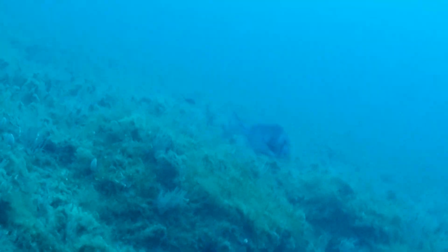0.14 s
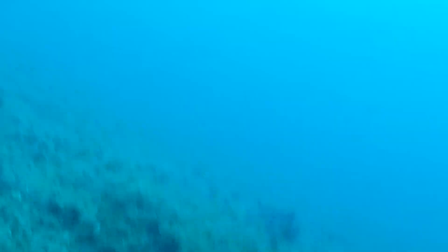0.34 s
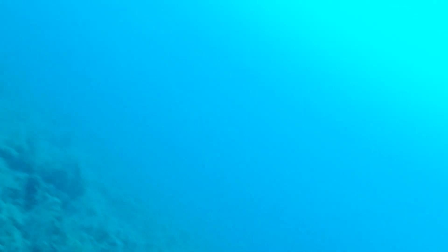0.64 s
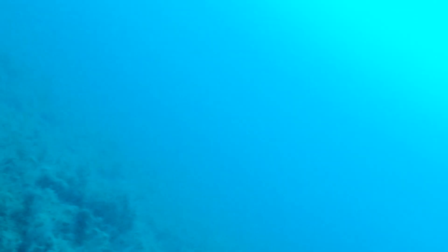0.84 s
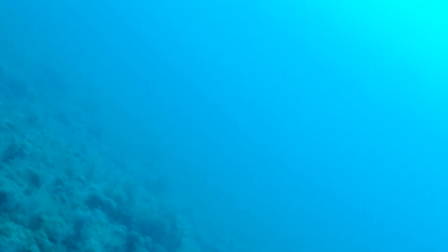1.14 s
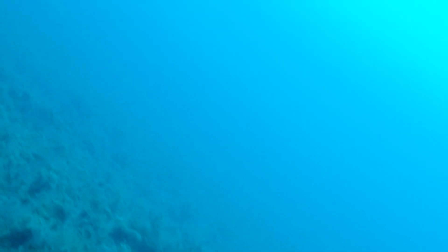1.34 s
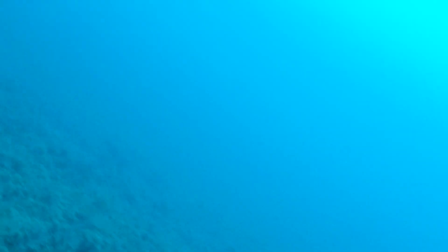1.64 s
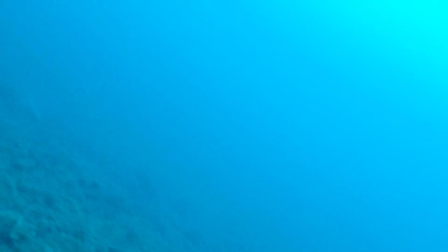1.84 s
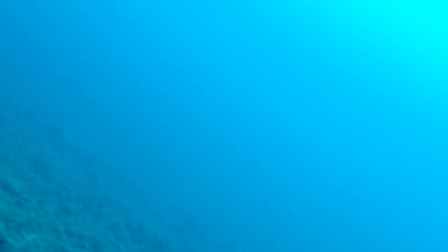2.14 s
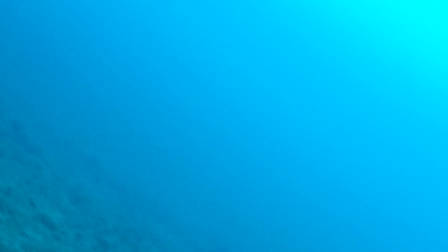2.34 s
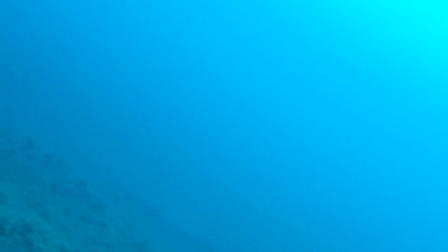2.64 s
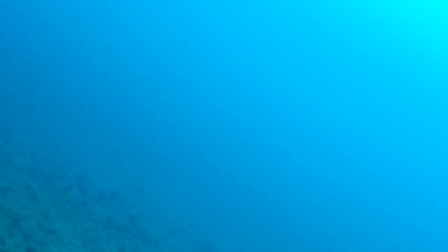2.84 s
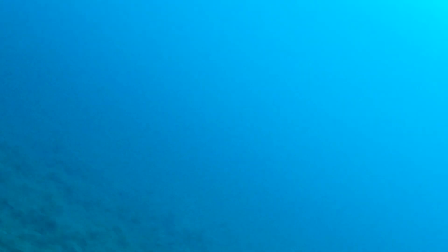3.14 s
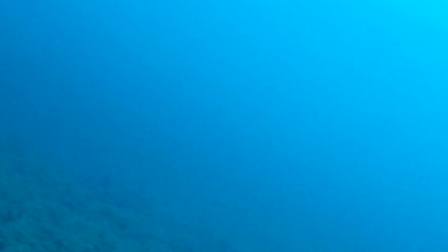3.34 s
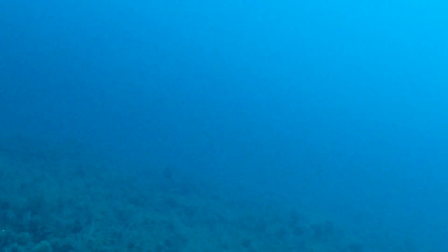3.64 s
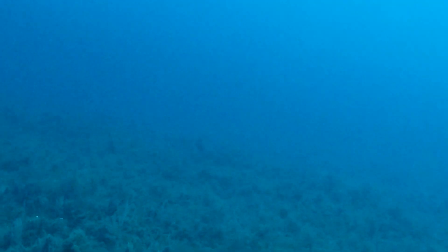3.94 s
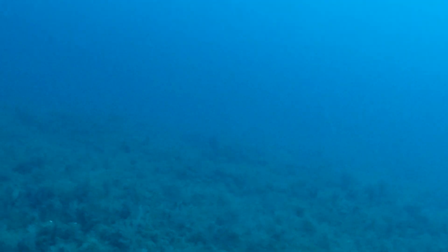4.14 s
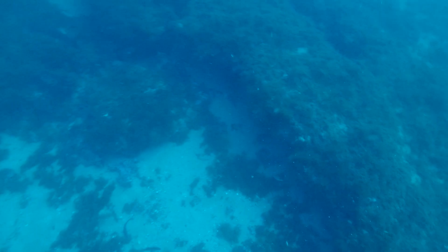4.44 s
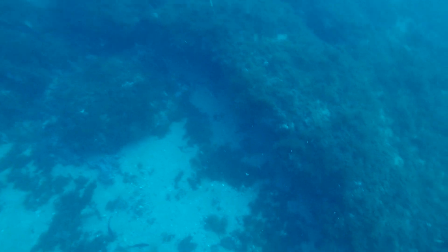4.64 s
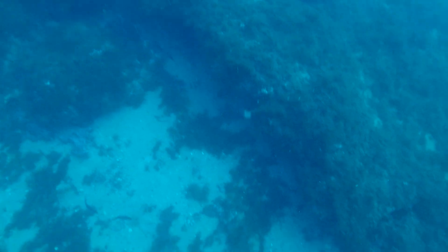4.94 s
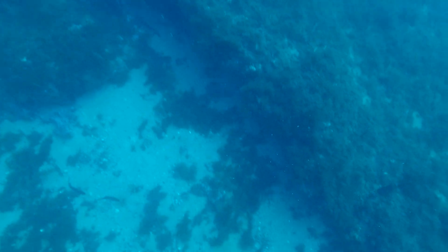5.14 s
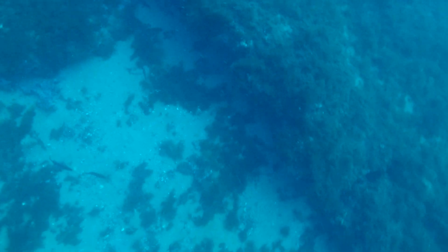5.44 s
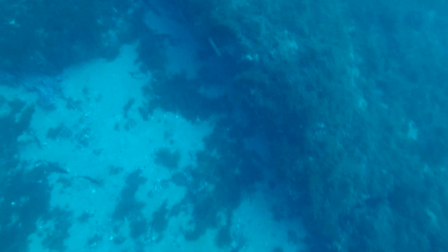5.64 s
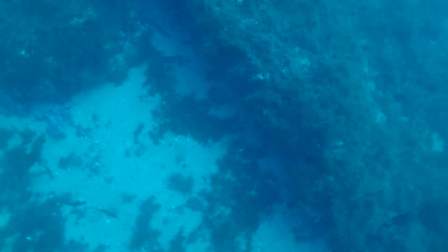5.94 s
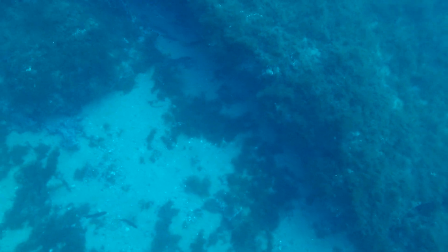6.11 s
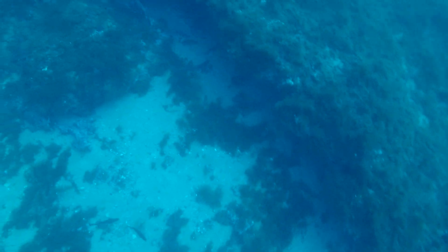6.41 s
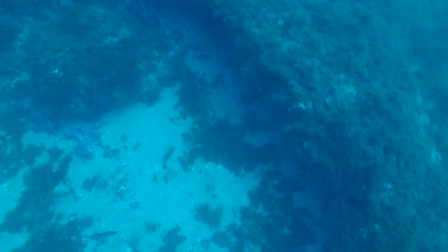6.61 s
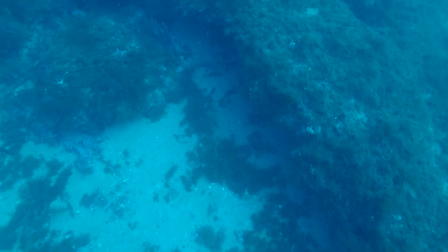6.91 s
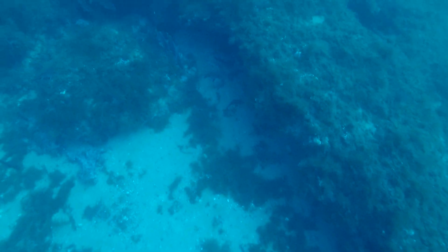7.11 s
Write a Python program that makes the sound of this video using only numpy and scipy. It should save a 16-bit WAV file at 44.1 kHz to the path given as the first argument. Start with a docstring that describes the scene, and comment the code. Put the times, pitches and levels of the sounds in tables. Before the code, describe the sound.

Muffled boat engine clatter rings beneath the sea amid fine shrimp crackle and booming bubbles, then a cut brings rumble, taps and sharp snaps.

```python
"""Under water over a reef, from a camera drifting in a dive housing with two microphones on its plates.
From the start a far boat diesel knocks and rings the case near 1.4 kHz, over shrimp crackle and slow flow;
bubbles gurgle and boom in a low air pocket, mostly on the right, and a dull bump shakes the case at 2.2 s.
At 4.4 s a cut leads to a second place: a surge rumbles and dies away, gear taps the case, the diesel is weaker.
A small bright tick follows at 5.4 s, and the hardest near snap at 6.6 s; diesel and water go on to the end."""
import sys
import numpy as np
from scipy import signal
from scipy.io import wavfile
from scipy.ndimage import uniform_filter1d

SR = 44100
rng = np.random.default_rng(int(sys.argv[2]) if len(sys.argv) > 2 else 0)


def digitize_waveform(pressure):
    """Quantize a signal to 16-bit integers and store it at the path in sys.argv[1].

    Rows of a 2-D input are taken as channels; values are limited to [-1, 1].
    """
    field = np.atleast_2d(pressure).T
    bounded = np.clip(field, -1, 1)
    quanta = np.round(bounded * 32767).astype(np.int16)
    wavfile.write(sys.argv[1], SR, quanta)


N = 320607
T = np.arange(N) / SR  # seconds
CUT_S = 4.435
AFTER = T >= CUT_S

# Slow flow, and a surge at the cut that dies away
FLOW_DB, SURGE_DB, SURGE_FADE_DB_S = -81, -55.5, 10.5
# Broad wash under the modes. Each row: centre in Hz, relative density in dB per Hz, likeness left to right (-1 to 1)
WASH_BANDS = [(121, -26, -0.49), (181, 1.5, 0.62), (240, -3, -0.024), (410, -6.5, -0.46),
              (642, -11.5, -0.83), (1090, -3, -0.99), (1710, -8.5, -0.4), (2870, -27, 0.74),
              (4920, -28.5, 0.0022), (9100, -26, 0.82), (11400, -36, -0.67), (14900, -26.5, 0.59)]
WASH_DB = -49.5
# Moving water, one list per place. Each row: time in seconds, pocket murmur in dB,
# wash swell in dB (heard about its mean)
WATER_LEVELS = [
    [(0.0, -49.5, -65.5), (0.42, -53, -58), (0.7, -58, -61), (1.0, -58.5, -64), (2.0, -59, -63.5),
     (2.45, -58.5, -59.5), (3.05, -54.5, -63), (3.6, -54.5, -59.5), (3.95, -52, -63.5), (4.43, -56.5, -65)],
    [(4.44, -51, -65), (5.0, -55.5, -67.5), (5.35, -63, -66), (5.8, -56, -64), (6.3, -58, -66.5),
     (6.6, -62, -69.5), (7.27, -60, -66.5)],
]
# Booms in the air pocket. Each row: time in seconds, level in dB, pitch in Hz, left minus right in dB
BOOMS = [(0.134, -27, 154, -7), (0.199, -31, 157, -1), (0.359, -31, 159.4, -14), (0.404, -32, 160, -11),
         (0.565, -31.5, 164, -7.5), (0.69, -40, 160, -11), (0.738, -40, 160, -16.5), (0.965, -41, 160, -9),
         (1.098, -39.5, 148, -13), (1.42, -43.5, 158, -11), (1.84, -43.5, 158, -11),
         (2.014, -40.5, 269, -6), (2.629, -41, 188, -9), (3.509, -45, 275, -4), (4.621, -37.5, 209, 0),
         (4.897, -37.5, 187, -7), (0.915, -36, 211, 0), (2.081, -39.5, 154, -8), (2.239, -33.5, 179, -7.5),
         (2.32, -38, 181, 3), (2.518, -40, 163, -7.5), (3.117, -37, 157, -5), (3.184, -36.5, 156, -7),
         (3.264, -29.5, 161, -13), (3.378, -30, 150, -6), (3.46, -22.5, 157, -8.5), (3.712, -27, 159.7, -5),
         (3.902, -31, 157.4, -11.5), (4.014, -37, 155, -6), (4.314, -38, 160, -15), (4.41, -39.5, 170, -7),
         (4.795, -39.5, 181, -14), (5.29, -34.5, 157, -4), (5.752, -30, 205, -2), (5.771, -30, 230, -0.5),
         (5.804, -33, 164, -7), (5.889, -41.5, 184, -9), (5.934, -35, 173, -7), (6.068, -35.5, 172, -7.5)]
BOOM_RISE_MS, BOOM_HOLD_MS, BOOM_RING_MS = 3.9, 9.9, 150  # at the pocket's pitch; the ring falls 60 dB
POCKET_HZ, QUICKER = 160, 0.71  # a boom above the pocket's pitch runs quicker by this power of the ratio
# Bursts of small bubbles. Each row: start in seconds, time to the fade in seconds, level in dB,
# largest bubbles in dB relative to that level
GURGLES = [(0.115, 0.021, -41, -10.5), (0.277, 0.21, -42, -12.5), (0.532, 0.058, -50, -16),
           (3.095, 0.031, -48, -0.5), (3.227, 0.03, -52, -1.5), (3.437, 0.028, -43, -1),
           (3.72, 0.21, -49, -7.5), (4.781, 0.019, -53, 0), (5.738, 0.038, -54, 11.5)]
GURGLE_RISE_S, GURGLE_FADE_DB_S = 0.0041, 244
# Treble modes rung by snaps. Each row: pitch in Hz, nominal width in Hz, relative level in dB before the cut,
# the same after it, left minus right in dB, lead of the right in radians
TREBLE_MODES = [(2900, 950, -1, -6, 2, 0.9), (3880, 5100, -37, -16.5, -26.5, 3),
                (5770, 550, 0.5, 3, 5.5, 3.5), (7320, 1860, -7, 2.5, -10, 3.5),
                (7560, 1450, 2.5, -3.5, -10, 3.5), (9490, 1040, -4, -1.5, -10, 5),
                (13400, 940, -19, -12, -3, -5)]
# Near snaps. Each row: start in seconds, peak of the bright part in dB, dull part in dB relative to the bright
NEAR_SNAPS = [(0.0247, -37, -30), (0.073, -32.5, -27), (0.4754, -38, -30), (0.912, -35.5, -23),
              (1.0894, -40, -30), (1.554, -36, -32), (1.846, -39, -30), (5.049, -37, -30),
              (5.2041, -36, -30), (6.0107, -36, -28), (6.379, -37, -30), (6.768, -38.5, -26),
              (7.191, -38, -30), (0.443, -34.5, -13), (0.584, -35.5, -5), (0.709, -33, -22),
              (0.987, -34, -28), (1.028, -31, -11), (1.252, -35, -32), (1.4787, -31.5, -17),
              (1.7468, -35, -10), (1.901, -32.5, -29), (1.9387, -31, -32), (2.529, -36, -26),
              (2.504, -43, -30), (2.596, -42, -30), (2.671, -35, -40), (2.6815, -37, -30),
              (2.6865, -40, -30), (2.6935, -39, -30), (2.7015, -40, -30), (2.713, -26, -35),
              (2.746, -33, -29), (3.176, -38, -22), (3.48, -35, -20), (3.4845, -33, -25),
              (3.5683, -37, -30), (3.587, -34.5, -12), (3.955, -33, -31), (4.084, -33.5, -10),
              (4.1125, -35, -12), (4.475, -35, -32), (4.552, -35.5, -30), (4.605, -38, -30),
              (5.432, -39, -30), (4.9771, -26.5, -6), (5.015, -29, -8), (5.226, -31, -38),
              (5.5876, -35, -38), (5.6206, -33, -34), (6.072, -34, -31), (6.161, -23.5, -10),
              (6.252, -31.5, -31), (6.463, -33.5, -11), (6.498, -28.5, -37), (6.601, -19, -8),
              (6.6155, -35, -30), (6.859, -30.5, -29), (6.9586, -34, -16)]
CRACKLE_PER_S, CRACKLE_DB = 900.0, -60
CRACK_DB, CRACK_MS = -0.5, 0.03  # wide crack in the dull part of a near snap
# Dull bumps on the case. Each row: start in seconds, relative size in dB, time scale of the left swing in ms,
# of the right swing in ms, left minus right in dB
BUMPS = [(0.054, -34, 1.15, 1.55, -4), (.127, -26, 1.35, 1.6, -2), (2.2061, -12.5, 0.96, 1.44, -7.5),
         (3.458, -30, 1.3, 1.8, 10), (3.713, -27.5, 2.1, 2.8, 5.5), (4.440, -31, 1.8, 1.8, -8.5),
         (4.5719, -25, 2.1, 1.6, 2)]
CLICK_MS = 0.036  # thin click inside a tap and inside a bump
# Gear taps on the case. Each row: start in seconds, level in dB, contact in ms (never under 0.1)
TAPS = [(4.5604, -18.5, 0.51), (4.5854, -14, 0.54), (4.684, -35, 0.17), (4.785, -31, 0.71),
        (4.803, -28, 0.65), (4.977, -30.5, 0.089), (5.0144, -25, 0.36)]
# Small bright tick. Each row: start in seconds, relative level in dB, pitch in Hz
TICKS = [(5.4147, -26, 2960)]
# Modes of the housing. Each row: pitch in Hz, nominal width in Hz, engine share in dB before the cut,
# engine share in dB after it, tap share in dB, left minus right in dB, lead of the right in radians
HOUSING_MODES = [(560, 92, -8.5, -5.5, -19, -0.5, -3.0), (813, 65, -4.5, -0.5, -8.5, 0.5, -3.0),
                 (1083, 64, -8.5, -4.5, 3.5, -0.5, -2.5), (1242, 89, 6, 9, -27, 3.5, -2.5),
                 (1340, 99.3, 7.5, 7.5, -19, 1, -1.5), (1485.5, 142, -3.5, -2, -17, -6.5, -1.15),
                 (1938, 91, -15.5, -1.5, 0.5, -0.5, 4), (2136, 120, -15, -24, -30, 10, 2.5),
                 (2656, 100, -19, -29, -22, -8, 0.5), (3037, 76, -20, -19, -39, -4, -0.4),
                 (3640, 260, -29.5, -22.5, -13.5, 5.5, 0.7)]
MAIN = 4  # row of the main mode
LOW_CUT_HZ = 137.8  # the camera's steep low cut
# The diesel as heard, one list per place. Each row: time in seconds, level in dB, change of the mode near 1 kHz in dB
ENGINE_LEVELS = [
    [(0.0, -42, 0), (0.3, -41, 3), (0.6, -43, -2), (1.2, -43.5, 3), (2.05, -39.5, -1), (2.4, -46, 8),
     (3.03, -44.5, 14), (3.85, -46, 6.5), (4.43, -42.5, 6)],
    [(4.44, -54.5, -6), (5.09, -51, 8), (5.59, -54.5, -22), (6.1, -47, 1), (7.27, -47, 10)],
]
# The case turns, one list per place. Each row: time in seconds, main mode in Hz, then changes in dB of
# its lower neighbour, its upper neighbour and the mode near 2 kHz
CASE_TURN = [
    [(0, 1350, -2, 3.5, -2), (0.5, 1407, -6.5, 2, 5), (1.0, 1400, -3.5, 1.5, 0), (1.5, 1383, -10.5, 0, -1),
     (2.1, 1360, -4, -6.5, 9), (2.6, 1324, 2.5, -0.5, 8), (3.0, 1315, 3, 1, -15), (3.4, 1363, -1, 0, 5),
     (4.0, 1372, -6, -1.5, 0), (4.43, 1360, -3.5, 1, -3)],
    [(4.44, 1327, 0, 1, -5), (5.2, 1340, -14, 3, 2.5), (5.7, 1370, 0, 1, 4), (6.0, 1278, -14, 0, 6),
     (6.5, 1294, -1, 1.5, -6), (7.27, 1348, -9, -5, 0)],
]
# Knock of the four cylinders in relative dB: one row before the cut, one after
CYLINDERS_DB = [(0, -14.5, -3.5, -5), (2, -12.5, -3, -37)]
# The engine speed wavers, so firings come early or late. Each row: time in seconds, lag in ms
FIRING_LAG = [(0, 10.8), (4.43, 6.9), (4.44, 0.79), (5.9, 12), (7.27, 6.3)]
# Loudest firings. Each row: time in seconds, level in dB (the peak stands 3 dB above it), main mode in Hz
LOUD_KNOCKS = [(0.0278, -39, 1462), (0.1146, -41, 1330), (0.2593, -41, 1340), (0.2967, -40, 1425),
               (0.3745, -39.5, 1405), (0.6469, -36.5, 1354), (0.7317, -40, 1356), (0.8086, -39, 1436),
               (1.0425, -40.5, 1280), (1.2077, -37.5, 1360), (1.2979, -38.5, 1444), (1.3628, -40.5, 1340),
               (1.4082, -44, 1340), (1.5259, -38.5, 1340), (1.5658, -35.5, 1385), (1.6846, -39.5, 1294),
               (1.7644, -36.5, 1370), (1.8437, -41, 1380), (1.9245, -45.5, 1375), (2.0023, -40, 1340),
               (2.0877, -35, 1366), (2.1655, -39, 1355), (2.2438, -38.5, 1313), (2.3196, -39, 1340),
               (2.4813, -39, 1340), (2.9612, -42, 1400), (3.2031, -40.5, 1516), (3.2809, -39.5, 1340),
               (3.3603, -41.5, 1374), (3.4401, -43.5, 1365), (3.5234, -40.5, 1390), (3.7938, -39.5, 1400),
               (3.9544, -40.5, 1350), (4.0716, -42, 1340), (4.1395, -42.5, 1390), (4.9383, -42, 1320),
               (5.4257, -41.5, 1346), (5.5893, -44.5, 1380), (5.9884, -45, 1280), (6.0672, -41, 1304),
               (6.2249, -38, 1320), (6.382, -41.5, 1290), (6.4224, -42, 1360), (6.5411, -38.5, 1330),
               (6.6973, -43, 1357), (6.8574, -41.5, 1363), (7.1009, -43.5, 1350), (7.1702, -44.5, 1367)]
FIRING_HZ = 25.12
SAME_AGAIN, HALF_CYCLE_DB = 0.8, -4.5  # likeness of successive cycles; share that returns every half cycle
CLACK_EARLY_MS, CLACK_MS = 4.2, 4.4  # bright clack ahead of each firing
ECHO_MS, ECHO_DB = 6.5, -6  # a loud blow comes again off the bottom
TOP_HZ = 15700


def undb(db):
    """Gain from decibels."""
    return 10 ** (np.asarray(db) / 20)


def unit(x):
    """Scale to an rms of 1."""
    return x / np.sqrt(np.mean(np.abs(x) ** 2))


def curves(tables):
    """Straight lines through the rows of both places, one curve per column."""
    times, *columns = np.transpose(np.vstack(tables))
    return [np.interp(T, times, column) for column in columns]


def either(before_db, after_db):
    """Gain that steps at the cut."""
    return np.where(AFTER, undb(after_db), undb(before_db))


def walk(rate):
    """Random levels held 1 / rate seconds and slewed twice; spread near 1."""
    hold = int(SR / rate)
    steps = np.repeat(rng.standard_normal(N // hold + 1), hold)
    return 1.85 * uniform_filter1d(uniform_filter1d(steps, hold), hold)[:N]


def add(out, start_s, sound):
    """Lay a sound into the mix at its start."""
    i = int(start_s * SR)
    out[..., i:i + sound.shape[-1]] += sound[..., :N - i]


def filtered(design, x):
    """Run second-order sections over a sound."""
    return signal.sosfilt(design, x)


def click(t, db, late_ms, ms):
    """One very short swing."""
    u = (t * 1000 - late_ms) / ms
    return -undb(db) * u * np.exp(0.5 - u ** 2 / 2)


def ring(x, hz, width_hz):
    """Complex mode: a damped resonance with gain 1 at its centre."""
    r = np.exp(-np.pi * width_hz / SR)
    return signal.lfilter([1 - r], [1, -r * np.exp(2j * np.pi * hz / SR)], x)


def plates(z, pan_db, lead):
    """Each microphone hears one mode at its own level and phase; z may differ from side to side."""
    z = np.atleast_2d(z)
    left = undb(pan_db / 2) * z[0].imag
    right = undb(-pan_db / 2) * (z[-1] * np.exp(1j * lead)).imag
    return np.array([left, right])


def housing(push, gains, spread, sharp, main_hz=HOUSING_MODES[MAIN][0]):
    """One push rings all case modes; neighbours swing in opposite sense, which fills the gaps between them."""
    modes = [ring(ring(push, f, spread * w), f, sharp * w) for f, w, *_ in HOUSING_MODES]
    # the main mode may drift: turn the push down to 0 Hz, ring it there and turn it back
    turn = np.exp(2j * np.pi * np.cumsum(main_hz * np.ones(len(push))) / SR)
    main_width = HOUSING_MODES[MAIN][1]
    modes[MAIN] = turn * ring(ring(push / turn, 0, spread * main_width), 0, sharp * main_width)
    return sum((-1) ** k * gain * plates(z, pan, lead)
               for k, (gain, z, (*_, pan, lead)) in enumerate(zip(gains, modes, HOUSING_MODES)))


def rumble():
    """Slow flow presses on both microphones nearly alike: low noise with a large common part."""
    band = signal.butter(1, [7.0, 40.0], "band", fs=SR, output="sos")
    flow = filtered(band, rng.standard_normal((3, N)))
    size = undb(FLOW_DB) + AFTER * undb(SURGE_DB - SURGE_FADE_DB_S * (T - CUT_S))
    sway_db = 1.5 * walk(7.6) + np.array([[-1.0], [1.0]])
    return size * undb(sway_db) * unit(flow[0] + 0.5 * flow[1:])


def wash():
    """Third-octave bands of noise flicker alone; moving water swells the low ones most."""
    hz, db, alike = np.transpose(WASH_BANDS)
    swell_db = curves(WATER_LEVELS)[1]
    swell_db = swell_db - swell_db.mean()
    out = 0
    for f in 125 * 2 ** np.arange(0, 7, 1 / 3):
        likeness = np.interp(np.log(f), np.log(hz), alike)
        band = signal.butter(2, [f / 1.144, f * 1.143], "band", fs=SR, output="sos")
        mid, side = filtered(band, rng.standard_normal((2, N)))
        flicker_db = min(2.4, 12000.0 / f) * walk(12)
        gain = undb(np.interp(np.log(f), np.log(hz), db) + min(370.0 / f, 1) * swell_db + flicker_db)
        opposed = np.sqrt(1 - likeness) * side * np.array([[1], [-1]])
        out = out + gain * (np.sqrt(1 + likeness) * mid + opposed)
    return unit(out) * undb(WASH_DB)


def air_pocket():
    """The pocket murmurs and booms as resonances; a boom swells, holds a few swings and dies."""
    murmur = np.array([undb(db) * unit(ring(ring(rng.standard_normal(N), hz, 27.5), hz, 26.0).imag)
                       for hz, db in [(144, -3.0), (162, 5.5)]])  # left, right
    out = murmur * undb(curves(WATER_LEVELS)[0] + 2.77 * walk(14))
    t = T[:8192]
    leads = 2.07 + 0.45 * rng.standard_normal(len(BOOMS))
    for (s, db, hz, pan), lead in zip(BOOMS, leads):
        ms = t * 1000 * (hz / POCKET_HZ) ** QUICKER
        swell = (1 - np.exp(-ms / BOOM_RISE_MS)) ** 2
        decay = undb(-60 * np.clip(ms - BOOM_HOLD_MS, 0, None) / BOOM_RING_MS)
        boom = plates(swell * decay * np.exp(2j * np.pi * hz * t), pan, lead)
        add(out, s - 1.76 / hz, undb(db) * boom)  # the swell starts ahead of the listed time
    return out


def gurgle():
    """Random pops ring three bubble sizes; each burst rises fast, holds and fades."""
    pops = (rng.random(N) < 300.0 / SR) * rng.standard_normal(N)
    # pitch Hz, width Hz, level dB, left minus right dB, lead of the right rad
    bubbles = [(354.0, 115.0, -1.0, -1.3, -2.0), (561.0, 35.0, 0.0, 1.0, -3.0), (873.0, 80.0, -10.0, 0.0, -2.0)]
    large, *small = [undb(db) * plates(unit(ring(ring(pops, hz, 170.0), hz, width)), pan, lead)
                     for hz, width, db, pan, lead in bubbles]
    sizes, t = np.zeros((2, N)), T[:SR // 2]
    for s, length, db, large_db in GURGLES:
        fade_db = GURGLE_FADE_DB_S * np.clip(t - length, 0, None)
        swell = np.clip(t / GURGLE_RISE_S, 0, 1) * undb(db - fade_db)
        add(sizes, s, swell * undb([[0], [large_db]]))
    return sizes[0] * sum(small) + sizes[1] * large


def far_shrimp(spread_db=6.0, hiss_db=-0.5):
    """Countless far snaps of very uneven size ring the treble modes and merge to a crackle."""
    snaps = rng.random(N) < CRACKLE_PER_S / SR
    size = undb(spread_db * rng.exponential(size=N).clip(0, 3.2))
    swing = rng.standard_normal(N) + 0.79 * rng.standard_normal((2, N))
    far = unit(snaps * size * swing) * undb(1.6 * walk(7.9))
    push = far + undb(hiss_db) * rng.standard_normal((2, N))
    crackle = sum((-1) ** k * either(a, b) * plates(ring(ring(push, f, 1.38 * w), f, w), pan, lead)
                  for k, (f, w, a, b, pan, lead) in enumerate(TREBLE_MODES))
    return unit(crackle) * undb(CRACKLE_DB)


def near_shrimp():
    """Near snaps stand out: short noise bursts ring the treble modes, each with its own colour."""
    out, t = np.zeros((2, N)), T[:512]
    colours_db = 2.5 * rng.standard_normal((len(NEAR_SNAPS), len(TREBLE_MODES)))
    bursts = rng.standard_normal((len(NEAR_SNAPS), len(t))) * np.exp(-t / 0.0009)
    bursts[:, 0] = 4.4  # every snap starts with a hard blow
    crack = undb(CRACK_DB) * click(t, 0, 2 * CRACK_MS, CRACK_MS)
    for (s, db, dull_db), colour_db, burst in zip(NEAR_SNAPS, colours_db, bursts):
        parts = [undb((b if s > CUT_S else a) + g) * plates(ring(ring(burst, f, 2.2 * w), f, w), pan, lead)
                 for (f, w, a, b, pan, lead), g in zip(TREBLE_MODES, colour_db)]
        bright = sum(parts[1:])
        dull = parts[0] + crack * np.abs(parts[0]).max()
        snap = bright / np.abs(bright).max() + undb(dull_db) * dull / np.abs(dull).max()
        add(out, s, undb(db) * snap)
    return out


def bumps():
    """Each plate snaps over and settles; every half swing is longer and weaker than the one before."""
    out, t = np.zeros((2, N)), T[:2048]
    for s, db, *ms, pan_db in BUMPS:
        swing = t * 1000 / np.array(ms)[:, None]
        slowing = np.sin(6.1 * np.log(1 + swing) + np.array([[0], [-1.85]]))
        onset = (1 - np.exp(-9.0 * swing)) ** 2
        flex = slowing * np.exp(-0.25 * swing) / (1 + swing) ** 0.83 * onset
        sides = undb(db + np.array([[pan_db], [-pan_db]]) / 2)
        add(out, s, sides * (flex + click(t, db=-27.5, late_ms=0.13, ms=CLICK_MS)))
    return filtered(signal.butter(4, 110.0, "high", fs=SR, output="sos"), out)


def taps():
    """Gear gives a short push into every housing mode; a longer, softer contact is duller."""
    out, t = np.zeros((2, N)), T[:2048]
    for s, db, ms in TAPS:
        push = np.sin(np.pi * np.clip(t * 1000 / max(ms, 0.1), 0, 1))
        hit = housing(push, [undb(mode[4]) for mode in HOUSING_MODES], 19.0, 2.4)
        thin = click(t, db=-24, late_ms=0.9, ms=CLICK_MS)
        add(out, s, undb(db) * (hit / np.abs(hit).max() + thin))
    for s, db, hz in TICKS:
        tick = t / 0.0023 * np.exp(-t / 0.0022 + 2j * np.pi * hz * t)
        add(out, s, undb(db) * plates(tick, 0.0, -1.55))
    return out


def cyclic(count):
    """Noise returns every `count` firings and renews itself slowly: the same parts strike over the same paths."""
    period = int(round(count * SR / FIRING_HZ))
    fresh = rng.standard_normal((N // period + 1, period))
    fresh[1:] *= np.sqrt(1 - SAME_AGAIN ** 2)
    return signal.lfilter([1], [1, -SAME_AGAIN], fresh, axis=0).ravel()[:N]


def clacks(times, size):
    """A short bright rattle just ahead of each firing rings the modes near 3 kHz."""
    early = (times - CLACK_EARLY_MS / 1000).clip(0)
    starts = np.bincount((early * SR).astype(int), np.sqrt(size), N)
    ms = T[:1024] * 1000
    rattle = signal.fftconvolve(starts, ms * np.exp(-2 * ms / CLACK_MS))[:N] * cyclic(count=4)
    rung = sum(plates(ring(ring(rattle, f, 3.2 * w), f, 1.7 * w), pan, lead)
               for f, w, *_, pan, lead in HOUSING_MODES[8:10])
    return unit(rung) * either(-72, -80)


def turning_case(level_db, near_1khz_db):
    """As the case turns its main mode drifts and the modes beside it come and go."""
    gains = [either(a, b) for _, _, a, b, *_ in HOUSING_MODES]
    main_hz, *shares_db = curves(CASE_TURN)
    for mode, db in zip((2, 3, 5, 6), (near_1khz_db, *shares_db)):
        gains[mode] = gains[mode] * undb(db)
    place_db = np.where(AFTER, level_db[AFTER].mean(), level_db[~AFTER].mean())
    # the upper modes do not swell with the rest
    gains[7:] = [gain * undb(place_db - level_db) for gain in gains[7:]]
    return gains, main_hz


def loud_knocks(noise, burst, gains, blow):
    """The loudest firings ring the case one by one: a noise burst, a blow and its echo off the bottom."""
    out = np.zeros((2, N))
    blows = np.zeros(len(burst))
    blows[30] = blow
    blows[30 + int(ECHO_MS * SR / 1000)] = blow * undb(ECHO_DB)
    for s, db, hz in LOUD_KNOCKS:
        i = int(s * SR)
        push = noise[i:i + len(burst)] * burst + blows
        knock = housing(push, [gain[i] for gain in gains], 2.1, 0.64, hz)
        add(out, s - 0.002, np.sqrt(2) * undb(db) * knock / np.abs(knock.mean(axis=0)).max())
    return out


def engine(scatter_db=0.5, knock_ms=6.3, between_db=-9, fade_ms=70.0, blow=10.2):
    """Each firing is a blow and a noise burst; the water smears the rest to a roar that sinks until the next."""
    k = np.arange(int(N / SR * FIRING_HZ))
    time_chance, size_chance = rng.standard_normal((2, len(k)))
    times = k / FIRING_HZ
    times = times + np.interp(times, *np.transpose(FIRING_LAG)) / 1000 + 0.000777 * time_chance
    cylinder_db = np.array(CYLINDERS_DB)[(times > CUT_S) * 1, k % 4]
    size = undb(cylinder_db + scatter_db * size_chance)
    clack = clacks(times, size)
    # the loudest firings are sounded on their own
    size[[np.argmin(np.abs(times - when)) for when, *_ in LOUD_KNOCKS]] = 0

    ms = T[:2048] * 1000
    burst = (1 - np.exp(-ms / 7.7)) * np.exp(-ms / knock_ms)
    firings = np.bincount((times * SR).astype(int), size, N)
    last = (np.searchsorted(times, T) - 1).clip(0)
    since_ms = 1000 * (T - times[last]).clip(0)
    roar = undb(between_db) * np.exp(-since_ms / fade_ms)
    envelope = signal.fftconvolve(firings, burst)[:N] + roar

    level_db, near_1khz_db = curves(ENGINE_LEVELS)
    gains, main_hz = turning_case(level_db, near_1khz_db)
    noise = unit(cyclic(count=4) + undb(HALF_CYCLE_DB) * cyclic(count=2))
    push = envelope * noise + 0.48 * blow * firings
    steady = unit(housing(push, gains, 5.8, 0.75, main_hz)) * undb(level_db)
    return clack + steady + loud_knocks(noise, burst, gains, blow)


def scene():
    """A steep low cut in the camera thins everything below about 138 Hz; bumps and flow bypass it."""
    sound = wash() + air_pocket() + gurgle() + far_shrimp() + near_shrimp() + taps() + engine()
    low_cut = signal.cheby1(8, 0.5, LOW_CUT_HZ, "high", fs=SR, output="sos")
    return rumble() + bumps() + filtered(low_cut, sound)


def record(dry):
    """The microphones fall off above 11 kHz; nothing sounds above 15.7 kHz."""
    soft = filtered(signal.butter(3, 11500.0, fs=SR, output="sos"), dry)
    return filtered(signal.ellip(8, 0.2, 70, TOP_HZ, fs=SR, output="sos"), soft)


dry = scene()
out = record(dry)
digitize_waveform(out)
```